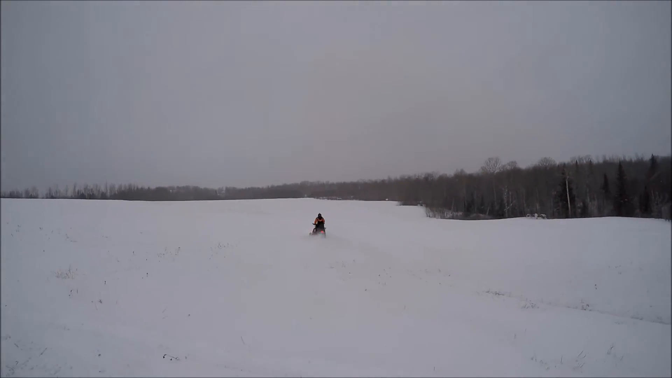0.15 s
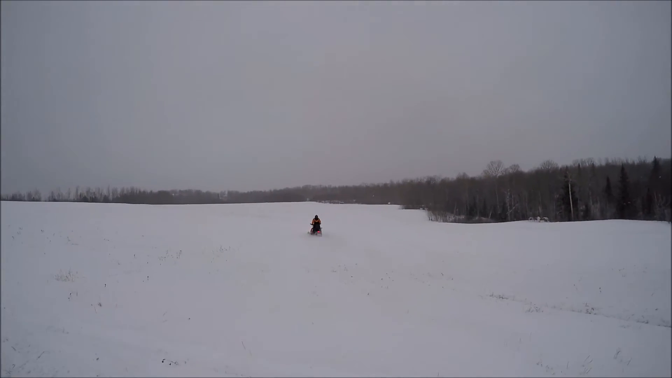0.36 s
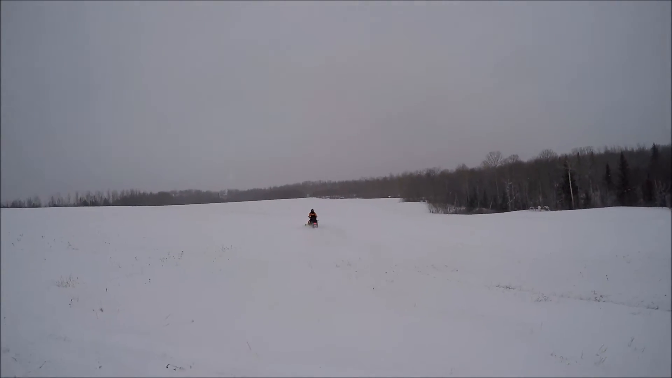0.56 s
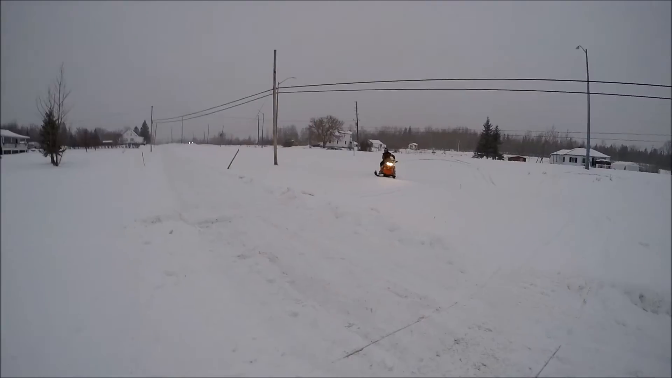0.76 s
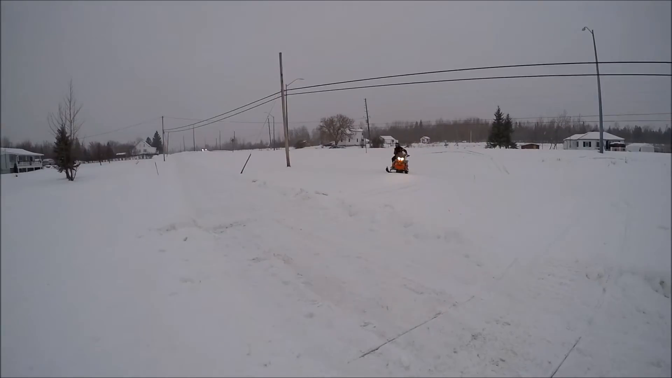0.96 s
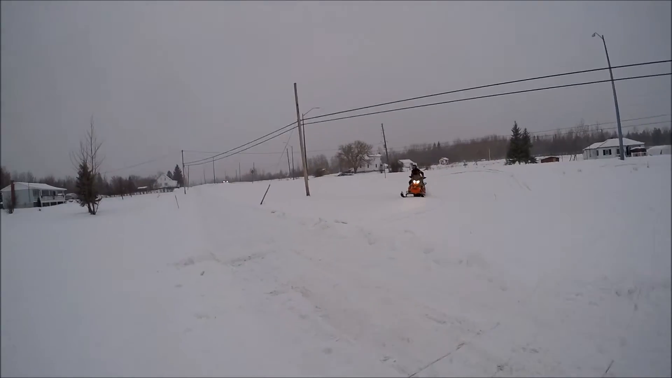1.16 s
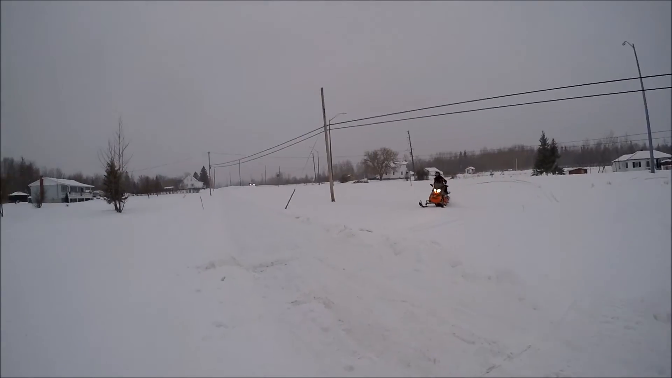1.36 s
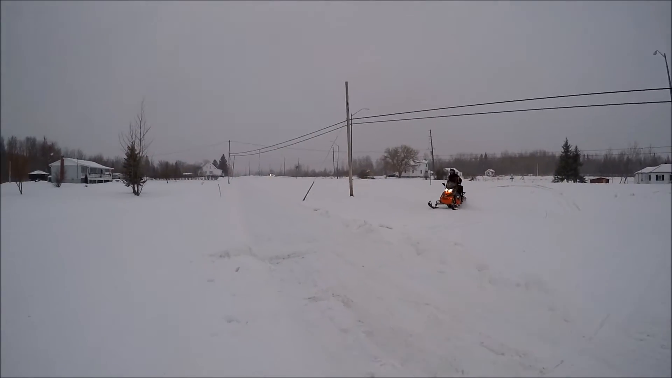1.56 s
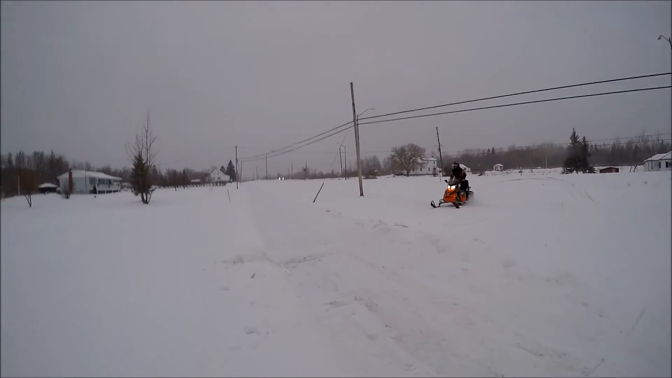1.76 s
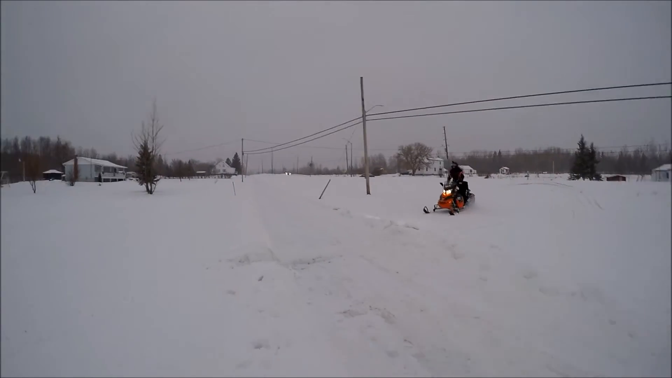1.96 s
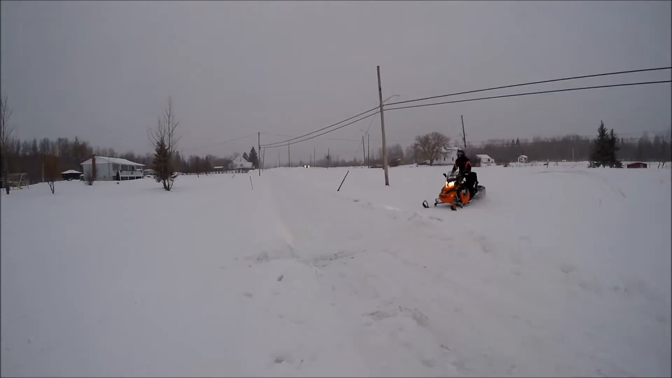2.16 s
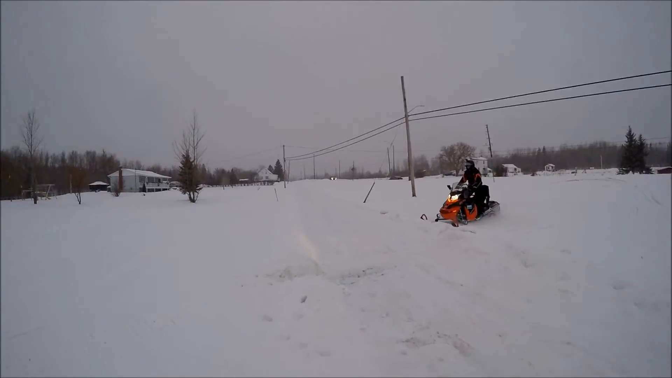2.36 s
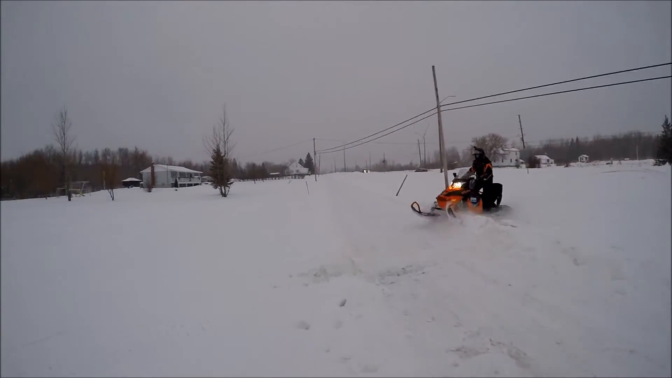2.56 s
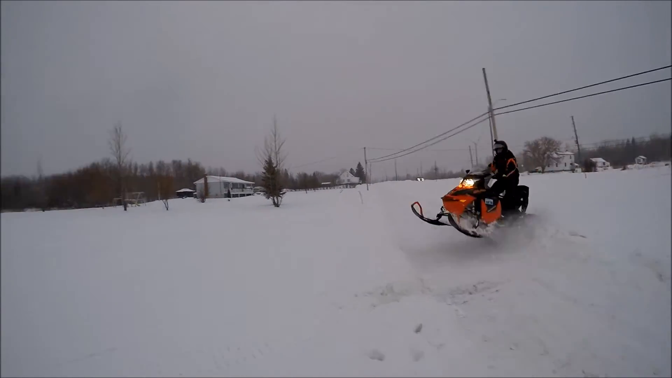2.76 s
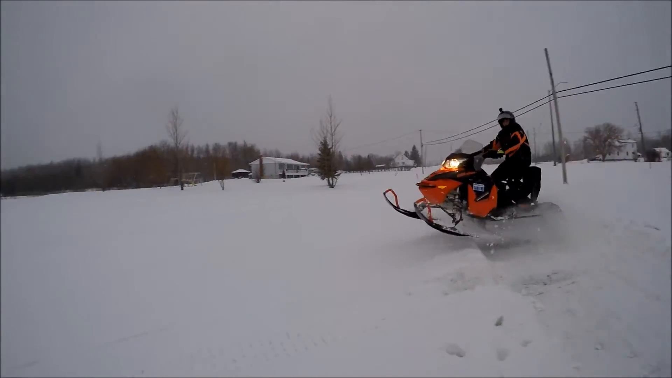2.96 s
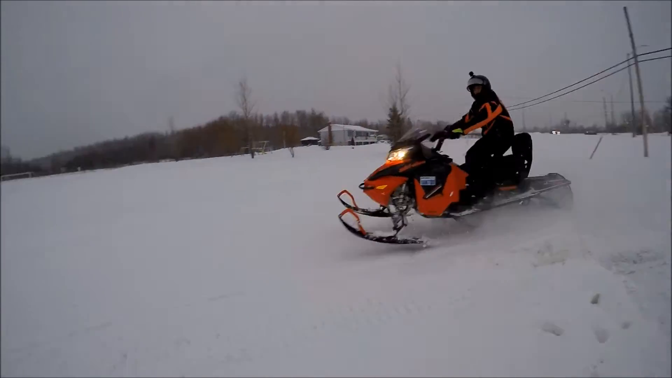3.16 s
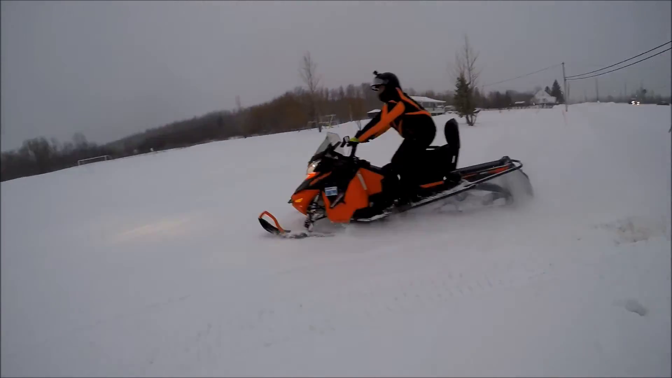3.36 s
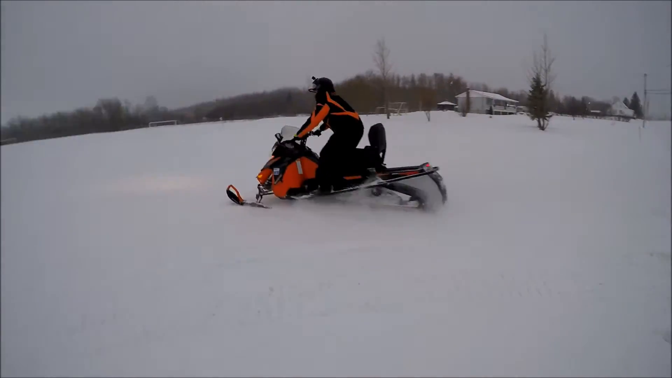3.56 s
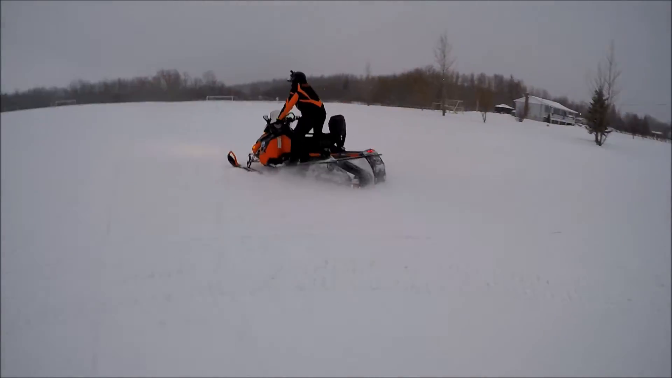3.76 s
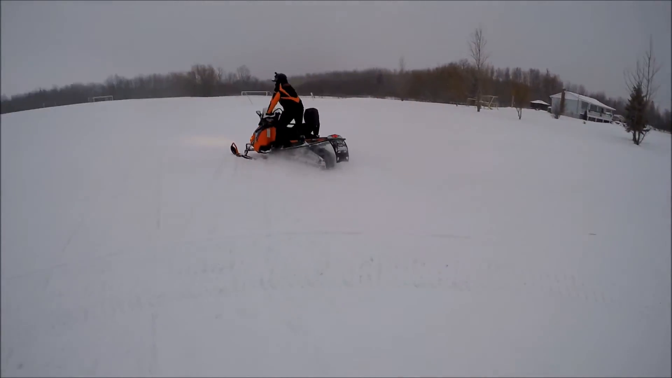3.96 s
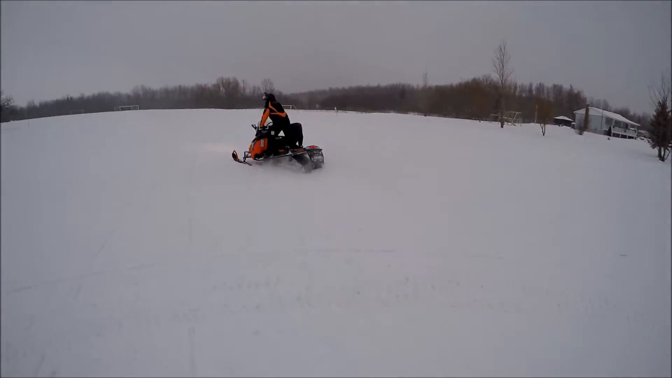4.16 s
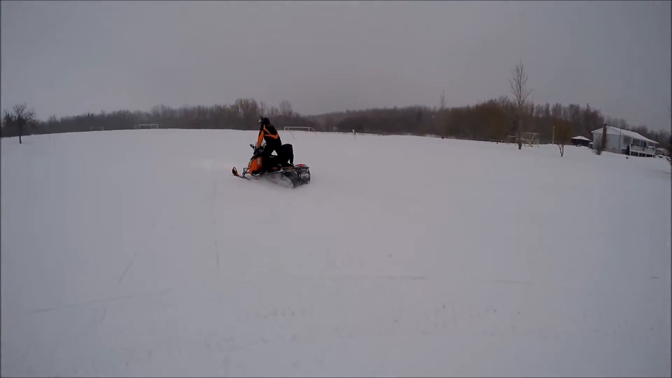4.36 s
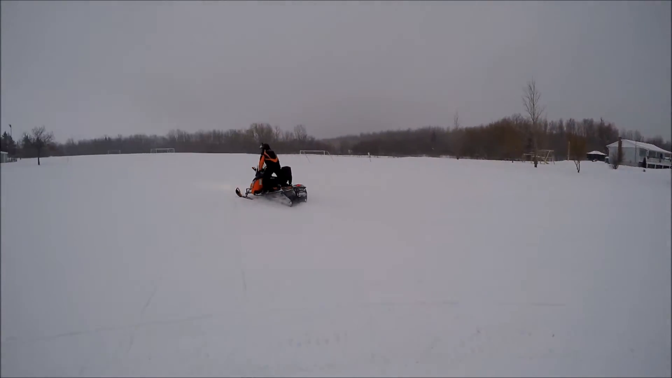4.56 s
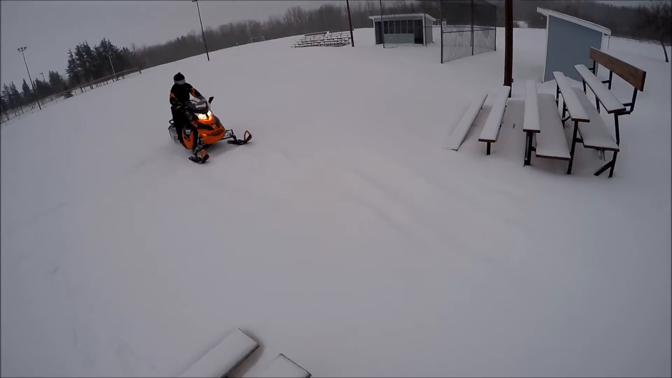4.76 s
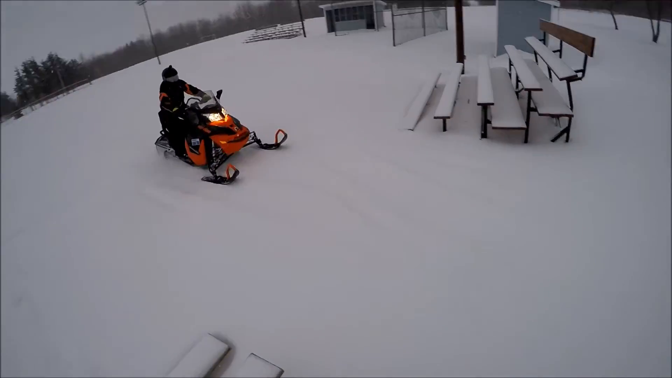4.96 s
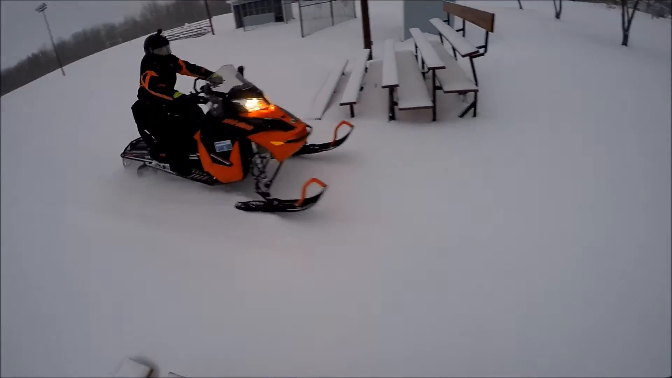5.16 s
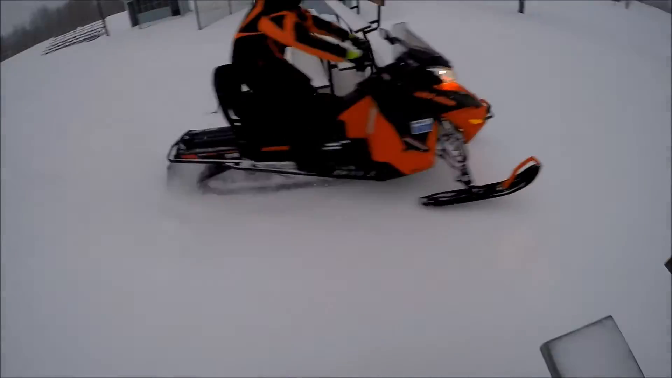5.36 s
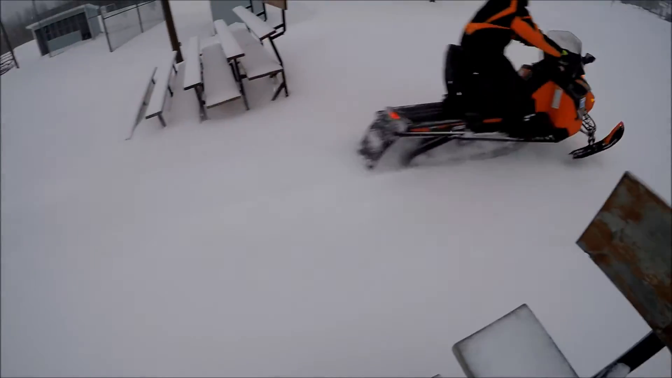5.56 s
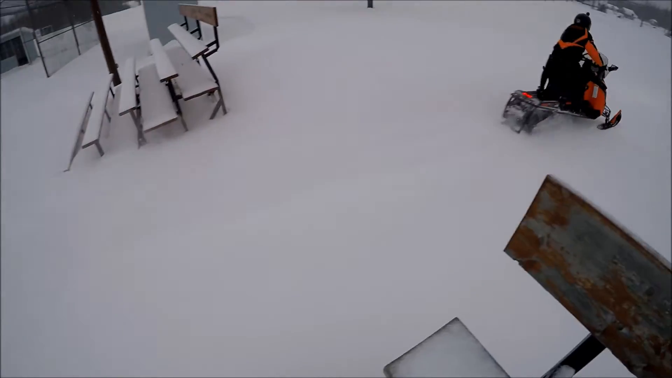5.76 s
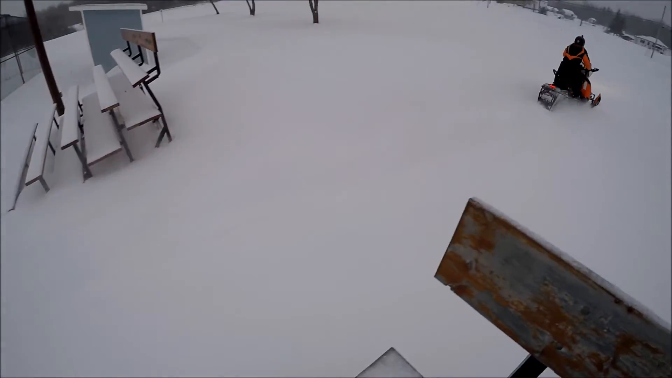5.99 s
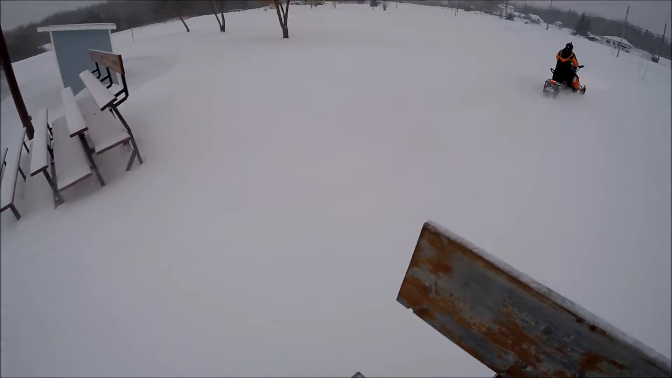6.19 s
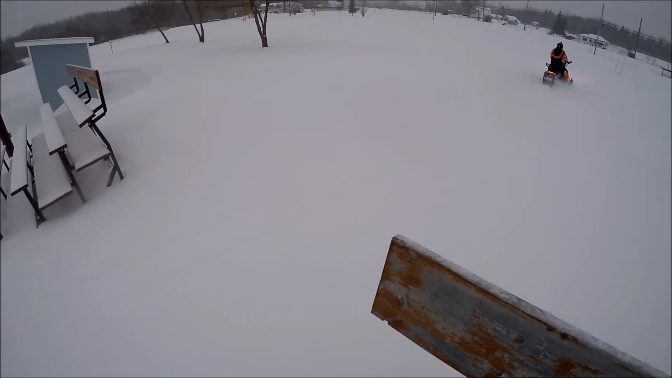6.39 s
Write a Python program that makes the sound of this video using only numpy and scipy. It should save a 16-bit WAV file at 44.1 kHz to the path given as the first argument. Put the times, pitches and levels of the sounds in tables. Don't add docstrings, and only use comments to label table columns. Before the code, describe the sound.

A buzzing two-cylinder snowmobile fades off amid loud handling knocks, then after brief silences swings past twice, the second time closest, with wind thudding the microphone.

```python
import sys
import numpy as np
from scipy import signal
from scipy.fft import rfft, irfft, next_fast_len
from scipy.io import wavfile
from scipy.ndimage import uniform_filter1d, map_coordinates

SR = 44100
rng = np.random.default_rng(int(sys.argv[2]) if len(sys.argv) > 2 else 0)


def digitize_waveform(pressure):
    field = np.atleast_2d(pressure).T
    bounded = np.clip(field, -1, 1)
    quanta = np.round(bounded * 32767).astype(np.int16)
    wavfile.write(sys.argv[1], SR, quanta)


def undo_db(level):
    steps = np.asarray(level, float) / 20
    return 10 ** steps


N = 283563
T = np.arange(N) / SR
SIZE = next_fast_len(N)
HZ = np.fft.rfftfreq(SIZE, 1 / SR)

# start [t/s], end [t/s]
SCENES = [
    (0, .654),
    (.74, 4.591),
    (4.628, 6.43),
]
# [t/s], crank rate [f/Hz]
CRANK_SPEED = [
    [(0, 102.4), (0.654, 98.7)],
    [(0.74, 76.85), (1.75, 77.8), (2.2, 97.6), (2.56, 124.1), (2.85, 120.1), (3.0, 106), (3.3, 73.53),
     (3.65, 67.13), (4.591, 61)],
    [(4.628, 101), (4.8, 106.9), (5.12, 127.8), (5.4, 124.8), (5.6, 116.8), (5.85, 84.8), (6.43, 74.44)],
]
# [t/s], lug rate [f/Hz], tone [level/dB]
LUG_SPEED = [
    [(1.95, 96, -60), (2.07, 101.3, -42), (2.43, 132.1, -30.5), (2.57, 156.3, -24.5), (3.03, 207.1, -27),
     (3.3, 143, -33), (3.38, 128.4, -19), (3.95, 108, -34.5), (4.59, 92.6, -34.5)],
    [(4.628, 155.9, -32), (4.872, 165.4, -29.5), (5.118, 211, -31.5), (5.18, 239.8, -33),
     (5.37, 250.4, -22), (5.662, 228.6, -24), (5.856, 193.3, -33), (6.354, 184.7, -46), (6.43, 173, -39)],
]
# [t/s], nearness as rasp [level/dB], exhaust over rasp [level/dB]
NEARNESS = [
    [(0, -47, -6.5), (0.654, -47, -11.5)],
    [(0.74, -50.5, 7.5), (1.76, -48.5, 11.5), (2.12, -42.5, -1), (2.45, -37, 4), (2.7, -35.5, 14.5),
     (3.09, -35, 9.5), (3.2, -37, 7), (4.08, -41.5, 9), (4.591, -43.5, -16)],
    [(4.628, -39.5, 8.5), (5.108, -29.5, 9.5), (5.28, -27.5, 9.5), (5.43, -22.5, 6), (5.65, -33, 13.5),
     (5.99, -41.5, 10.5), (6.43, -47, 3.5)],
]
# [f/Hz], [level/dB]
WIND_COLOUR = [(15, 2), (30, 12.5), (60, -3.5), (100, -13.5), (200, -25.5), (400, -63), (800, -47),
               (2000, -93)]
# [f/Hz], [level/dB]
ROAR_COLOUR = [(40, -14.5), (80, 12.5), (150, 11), (250, 5), (400, -4.5), (600, -15.5), (900, -23.5),
               (1500, -29), (4000, -90)]
# crest [t/s], [level/dB], length [t/s]
WIND_GUSTS = [(.1, -29, .3), (0.465, -25.5, 0.19), (0.747, -22, 0.17), (1.235, -33, 0.57),
              (1.47, -25.5, 0.09), (1.915, -25, 0.45), (2.29, -20.5, 0.22), (2.85, -24, .5),
              (3.351, -27.5, .6), (3.71, -23.5, .15), (3.95, -26.5, .1), (4.14, -23.5, 0.14),
              (4.351, -25, 0.092), (4.744, -35, .06), (5.001, -30, 0.29), (5.501, -28.5, 0.77),
              (6.054, -31.5, .22), (6.24, -32, .12)]
# [t/s], extra roar [level/dB], length [t/s]
DRIFT_SLAMS = [
    (3.024, 7, .25),
    (3.451, 6, 0.29),
]
# [t/s], fade of the extra roar [t/s]
TAIL_TURNS = [
    (.1, 1.1),
    (2.85, 1.32),
    (5.15, 8),
]
# [f/Hz], width [f/Hz], [level/dB]
HOUSING_MODES = [(1320, 350, 6.5), (1550, 490, 9.5), (1808, 180, 12), (2254, 280, 10), (2667, 90, 5.5),
                 (3378, 420, 2.5), (4090, 380, 5), (4585, 124, 3), (5440, 400, -9), (6570, 1330, -17),
                 (6470, 250, -34), (8570, 260, -25.5), (10500, 1600, -28.5), (12700, 2700, -52)]
# [f/Hz], width [f/Hz], [level/dB]
HOUSING_DIPS = [(3830, 130, -3), (5450, 350, -7), (7150, 350, -8), (9500, 300, -4), (11000, 300, -6)]
# [f/Hz], [level/dB]
PORT_RESPONSE = [(300, -24), (600, -5), (900, -4), (1200, 7), (13800, 9), (15300, 3), (16500, -32)]
# [t/s], peak [level/dB], ring [f/Hz], T60
CLICKS = [(.4325, -8, 2350, .022, -24), (.4424, -10, 2400, .012, -20), (.5485, -17, 1850, .022, -34),
          (.597, -27, 1900, .01, -20), (.6062, 1, 1650, .009, -14), (.6125, -24, 2000, .01, -5),
          (.6207, -12, 2200, .008, -6), (.6254, -11, 2100, .009, -20), (.6453, 6, 1380, .01, -14),
          (.653, -20, 1190, .012, -12), (.7405, -38, 1500, .005, -8), (.975, -35, 2470, .019, -2.5),
          (1.005, -44, 1880, .02, -5), (1.063, -46, 1417, .013, 7), (3.756, -34, 1940, .02, -4),
          (4.1085, -10, 2296, .013, -28), (4.356, -22, 1630, .025, -30), (4.5398, -6, 1750, .008, -20),
          (4.5445, -24, 1800, .02, -4), (5.627, -28, 1783, .015, -5), (5.738, -25, 1778, .02, -12),
          (4.629, -32, 3050, .06, -30), (6.178, -33, 1500, .018, -10), (6.311, -44, 1789, .016, -5)]
# [t/s], length [t/s], [level/dB], ring [f/Hz], share of wide scratch [ratio]
GLOVE_RUBS = [(0.434, 0.033, -23.5, 2240, 0.44), (0.561, 0.035, -28, 1950, 0.63),
              (0.631, 0.038, -26.5, 1760, 0.72), (2.963, 0.17, -36.5, 2280, 0.23),
              (2.923, 0.22, -37, 4159, 0.2), (3.741, 0.019, -44.5, 950, 0.19),
              (4.134, 0.018, -29.5, 1920, 0.25), (4.174, 0.046, -30, 1950, 0.23),
              (4.213, 0.069, -34, 2090, 0.086), (4.281, 0.031, -30, 2367, 0.27),
              (4.361, .02, -56, 1626, 0.43), (4.38, 0.0109, -37.5, 2020, 0.2),
              (4.39, 0.049, -33.5, 1780, 0.12), (4.463, 0.063, -38, 2295, 0.3),
              (4.58, 0.011, -39.5, 2013, 0.71), (5.737, 0.033, -40, 4150, 0.86),
              (5.813, 0.029, -39.5, 4123, 0.45)]
# crest [t/s], peak [level/dB], [f/Hz],
# length [cycles], direction [sign]
PUSHES = [(.059, -20, 170, 1.2, 1), (.4515, -6, 52, .95, 1), (.474, -16, 22, .7, -1),
          (.616, -11, 27, .6, -1), (.636, -15, 27, .6, 1), (.6482, 2, 135, .8, 1), (.6461, 6, 520, .7, -1),
          (.6066, -6, 900, .8, -1), (4.5397, -4, 1100, .8, -1), (.85, -45, 250, 2, 1),
          (.98, -45, 300, 2, 1), (1.45, -42, 250, 3, 1), (1.75, -28, 250, 2, 1), (4.122, -10, 55, 1.6, 1),
          (4.531, -13, 40, 1.2, 1), (4.565, -12, 26, 1.1, 1), (4.586, -17, 30, .6, 1)]
# crank order [number], against the rasp [level/dB]
WEAK_ORDERS = [(3, -30), (5, -25), (7, -26), (8, -22)]
TREBLE_LOSSES = [.858, 1.455, 1.735, 3.27, 3.4, 5.105, 5.445, 5.577]


def curve(tables, column):
    rows = np.concatenate(tables)
    return np.interp(T, rows[:, 0], rows[:, column])


def evened(x):
    return x / np.sqrt(np.mean(x ** 2) + 1e-20)


def read(points, hz):
    f, value = np.transpose(points)
    return np.interp(np.log(hz + 1), np.log(f + 1), value)


def add(mix, s, sound):
    part = mix[max(round(s * SR), 0):][:len(sound)]
    part += sound[:len(part)]


def wander(hz):
    count = 8192
    slope = np.sqrt(1 + (np.fft.rfftfreq(count, 64 / SR) / hz) ** 4)
    slow = irfft(rfft(rng.standard_normal(count)) / slope)
    return np.interp(T, np.arange(count) * 64 / SR, evened(slow))


def shaped(x, db):
    return evened(irfft(rfft(x, SIZE) * undo_db(db), SIZE)[:N])


def ring(x, hz, width):
    r = np.exp(-np.pi * width / SR)
    return signal.lfilter([1, -1], [1, -2 * r * np.cos(2 * np.pi * hz / SR), r * r], x)


def tone(turns, db, flutter_db, flutter_hz=10):
    strength = np.sqrt(2) * undo_db(db + flutter_db * wander(flutter_hz))
    return strength * np.sin(2 * np.pi * (turns + rng.random()))


def patchy(x, patch_db):
    z = signal.stft(x, nperseg=256)[2]
    field = rng.standard_normal(z.shape)
    for bands, frames in [(9, 140), (5, 60)]:
        field = uniform_filter1d(uniform_filter1d(field, bands, 0), frames, 1)
    return signal.istft(z * undo_db(patch_db * evened(field)), nperseg=256)[1][:N]


def housing_taps():
    hz = np.abs(np.fft.fftfreq(4096, 1 / SR))
    power = sum(undo_db(db) ** 2 / (1 + (2 * (hz - f) / w) ** 2) ** 1.43 for f, w, db in HOUSING_MODES)
    dips_db = sum(db * np.exp(-((hz - f) / w) ** 2) for f, w, db in HOUSING_DIPS)
    log_gain = np.log(power * undo_db(read(PORT_RESPONSE, hz) + dips_db) ** 2 + 1e-9) / 2
    return np.fft.ifft(np.exp(np.conj(signal.hilbert(log_gain)))).real[:2048]


def hiss():
    slope_db = 40 * np.minimum(np.log10(HZ / 9000 + 1e-3), 0)
    return undo_db(-71.5) * shaped(rng.standard_normal(N), slope_db)


def wind():
    breeze_db = -43
    lumps = shaped(rng.standard_normal(N), read(WIND_COLOUR, HZ))
    lumps /= np.sqrt(uniform_filter1d(lumps ** 2, 3000) + .06)
    power = undo_db(breeze_db) ** 2
    for s, db, length in WIND_GUSTS:
        power = power + undo_db(db) ** 2 * np.exp(-(2 * (T - s) / length) ** 2)
    return np.sqrt(power) * lumps


def clicks(taps):
    snap, snap_hz, snap_t60_s = 1.1, 4300, .0022
    out, t = np.zeros(N), np.arange(1300) / SR
    soft_start = 1 - np.exp(-t / .00025)
    for s, db, hz, t60, tick_db in CLICKS:
        upper = 0.68 * np.sin(2 * np.pi * 1.44 * hz * t)
        lower = 0.24 * np.sin(2 * np.pi * 0.52 * hz * t)
        mode = np.sin(2 * np.pi * hz * t) + (upper + lower) * undo_db(-60 * t / 0.036)
        mode = mode * undo_db(-60 * t / t60)
        tick = ring(rng.standard_normal(len(t)), 4200, 6000) * undo_db(tick_db - 60 * t / 0.0045)
        crack = (1 - np.exp(-t / .0001)) * np.sin(2 * np.pi * snap_hz * t) * undo_db(-60 * t / snap_t60_s)
        tick += snap * min(undo_db(tick_db + 24), 1) * crack
        body = mode + .5 * taps[:len(t)] / abs(taps).max()
        add(out, s, undo_db(db) * (soft_start * body + tick))
    return out


def rubs(taps):
    fade_db = -6
    out = np.zeros(N)
    for s, length, db, hz, wide in GLOVE_RUBS:
        n = min(round(length * SR), 9000)
        slips = undo_db(3 * evened(uniform_filter1d(rng.standard_normal(9000), 90)))
        grains = (rng.standard_normal(9000) * slips)[:n]
        grains = grains * signal.windows.tukey(n, .4) * undo_db(fade_db * np.arange(n) / n)
        grains = np.r_[grains, np.zeros(200)]
        squeak = ring(ring(grains, hz, 630), hz, 860)
        scratch = evened(np.convolve(grains, taps)[:len(grains)])
        scratch = scratch + 0.53 * evened(ring(ring(grains, 6500, 820), 8800, 2200))
        add(out, s, undo_db(db) * evened(evened(squeak) + wide * evened(scratch)))
    return out


def pushes():
    out = np.zeros(N)
    for s, db, hz, cycles, sign in PUSHES:
        u = np.arange(-cycles, cycles, hz / SR)
        swing = np.cos(2 * np.pi * u) * np.exp(-4 * (u / cycles) ** 2)
        add(out, s - cycles / hz, np.sign(sign) * undo_db(db) * swing)
    return out


def chassis_db():
    turn_s, roar_db, tail_db, far_roar_db = 0.39, -11.5, 13, -57
    slams_db = sum(db * np.exp(-(2 * (T - s) / length) ** 2) for s, db, length in DRIFT_SLAMS)
    tail = 0
    for (s, fade), (a, b) in zip(TAIL_TURNS, SCENES):
        turned = (1 + np.tanh((T - s) / turn_s)) / 2
        tail = tail + turned * ((T >= a) & (T < b + .1)) * np.exp(-np.maximum(T - s, 0) / fade)
    return np.maximum(curve(NEARNESS, 1) + roar_db + tail_db * tail + slams_db, far_roar_db)


def track():
    hz, db = curve(LUG_SPEED, 1), curve(LUG_SPEED, 2)
    turns = np.cumsum(hz * (1 + 0.0094 * wander(33.0))) / SR
    slowing = uniform_filter1d(np.clip(-np.gradient(hz) * SR, 0, 250), 2000)
    octave_db = db - 18.5 + 0.0269 * slowing
    rolling = np.interp(T, [1.8, 2], [0, 1])
    roar = shaped(rng.standard_normal(N), read(ROAR_COLOUR, HZ)) * undo_db(2.7 * wander(23))
    lugs = tone(turns, db, 3.5, 18) + tone(2 * turns, octave_db, 4)
    return rolling * lugs + undo_db(chassis_db() + 4.5) * roar


def exhaust_gas(turns, nearness_db, taps):
    gate = 1.5 + np.exp(-((2 * turns) % 1) / 0.69) * undo_db(4.0 * wander(120))
    gas = evened(gate * rng.standard_normal(N)) * undo_db(1.34 * wander(15.3))
    late = T - np.clip(0.0004695 + 0.02 * nearness_db, 0, 1)
    gas = gas - 0.21 * map_coordinates(gas, [late * SR], order=3)
    gas = signal.oaconvolve(gas, taps)[:N]
    return patchy(gas, 1.7)


def engine(taps):
    hz, rasp_db, load_db = curve(CRANK_SPEED, 1), curve(NEARNESS, 1), curve(NEARNESS, 2)
    nearness_db = rasp_db + 40
    speeding = uniform_filter1d(np.clip(np.gradient(hz) * SR, -80, 80), 4000)
    coasting = np.maximum(-speeding, 0)
    clean = .42 + .009 * (hz - 100) + .002 * speeding

    fire_db = rasp_db + load_db - .12 * coasting
    crank_db = chassis_db() + 0.62 * load_db - .12 * coasting
    fourth_db = -63.5 + 1.57 * nearness_db + 0.48 * load_db
    sixth_db = rasp_db + np.maximum(-16 - .6 * (hz - 64), -31.5)
    top_db = -54.5 + 1.236 * nearness_db

    turns = np.cumsum(uniform_filter1d(hz, 2000) * (1 + .0027 * wander(20))) / SR
    low = tone(turns, crank_db, 3.5) + tone(2 * turns, fire_db, 1.5 + .035 * coasting, 14)
    low += tone(4 * turns, fourth_db, 3.5) + tone(6 * turns, sixth_db, 3)
    weak = sum(tone(round(k) * turns, rasp_db + db, 4, 8) for k, db in WEAK_ORDERS)
    low += weak * np.clip(clean, 0, 1)
    pulses = sum((.75 if k % 2 else 1) * tone(k * turns, -.25 * k, 3.5, 6) for k in range(8, 31))
    pulses = signal.oaconvolve(pulses, taps)[:N]
    gas = exhaust_gas(turns, nearness_db, taps)

    edge_db = 40 * np.tanh(np.log(HZ / 2900 + 1e-9) * 8)
    split_db = 40 * np.tanh(np.log(HZ / 5000 + 1e-9) * 8)
    below = 2 * np.minimum(-edge_db, 0)
    middle = np.minimum(edge_db, 0) + 2 * np.minimum(-split_db, 0)
    above = np.minimum(split_db, 0)
    clean = np.clip(clean + .1, .1, .9)
    body = np.sqrt(1 - clean) * shaped(gas, below) + np.sqrt(clean) * evened(pulses)
    whine = undo_db(.5 * (rasp_db + top_db) - 1.5 + 0.43 * wander(6.2)) * shaped(gas, middle)
    top = undo_db(top_db + 0.45 * wander(27)) * shaped(gas, above)
    return low + whine + undo_db(rasp_db) * body + top


def scene():
    taps = housing_taps()
    sled = engine(taps) + track()
    air = wind()
    hand = clicks(taps) + rubs(taps) + pushes()
    return (sled + air + hand + hiss())[None]


def top_cut(x):
    return signal.sosfilt(signal.butter(12, 16500, fs=SR, output="sos"), x)


def record(dry):
    running = sum((T >= a) & (T < b) for a, b in SCENES).astype(float)
    cut = np.clip(dry, -.98, .98) * uniform_filter1d(running, 12)
    low_pass = signal.firwin(401, 15300, window=("kaiser", 9), fs=SR)
    limited = signal.oaconvolve(cut, low_pass[None], "same")
    high_pass = .8 * signal.firwin(129, 4500, fs=SR, pass_zero=False)
    treble = signal.oaconvolve(limited, high_pass[None], "same")
    loss = sum(np.exp(-((T - s) / .011) ** 4) for s in TREBLE_LOSSES)
    return top_cut(limited - loss * treble)


dry = scene()
out = record(dry)
digitize_waveform(out)
```